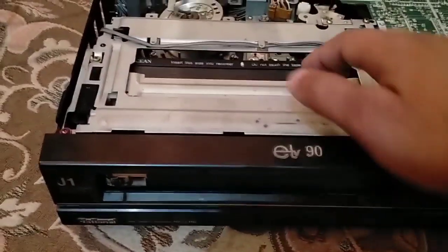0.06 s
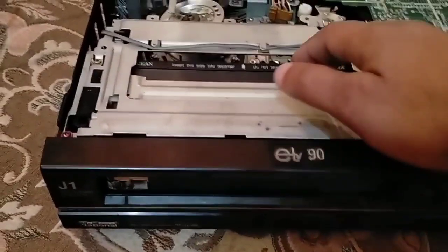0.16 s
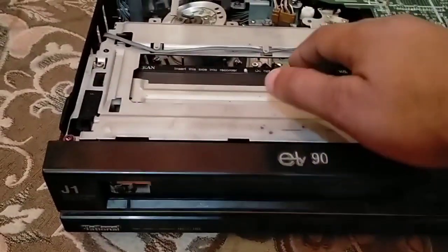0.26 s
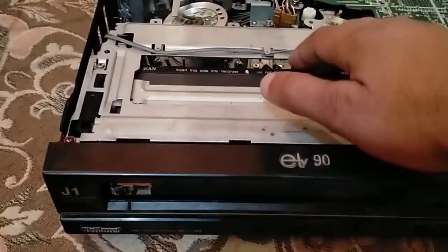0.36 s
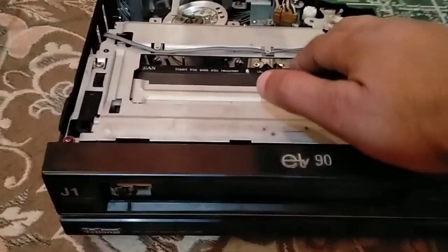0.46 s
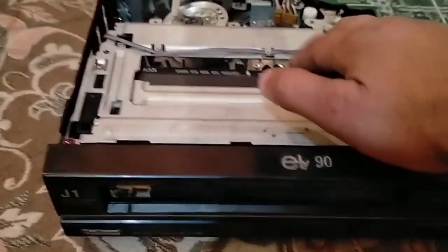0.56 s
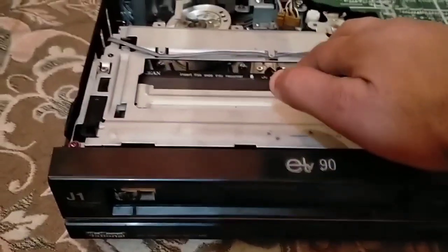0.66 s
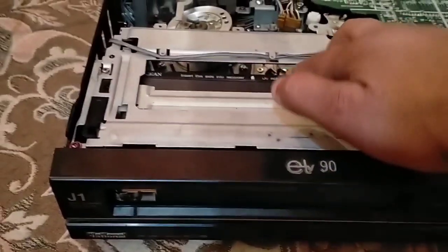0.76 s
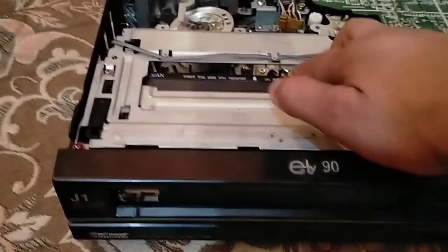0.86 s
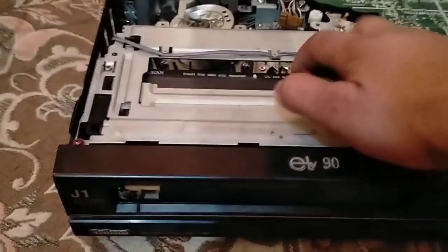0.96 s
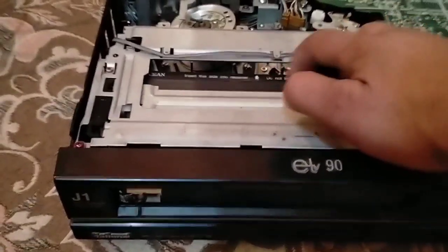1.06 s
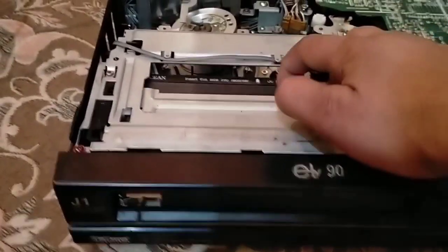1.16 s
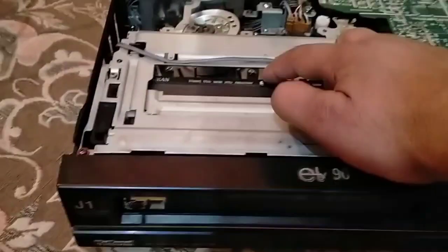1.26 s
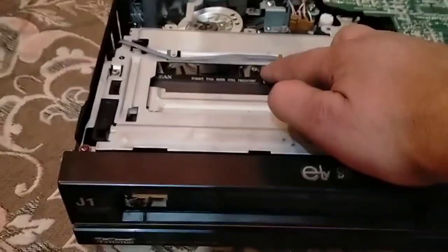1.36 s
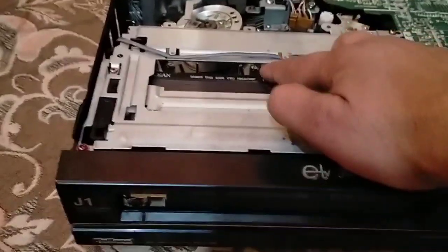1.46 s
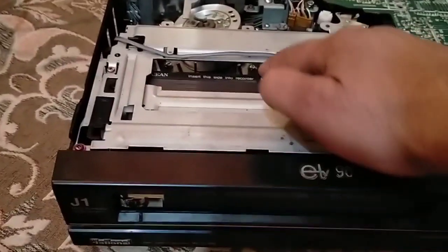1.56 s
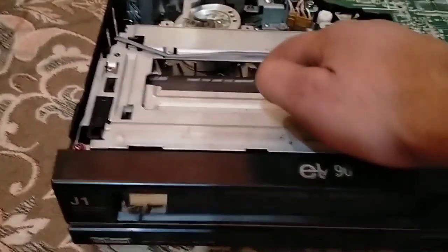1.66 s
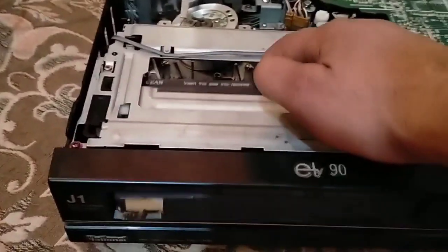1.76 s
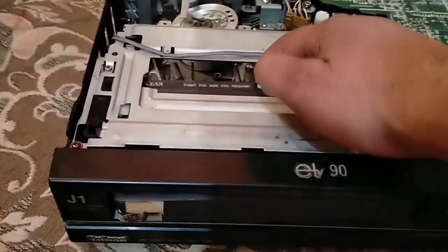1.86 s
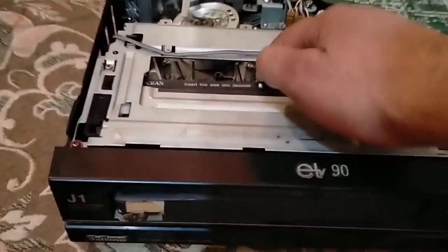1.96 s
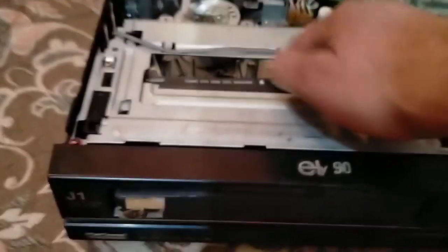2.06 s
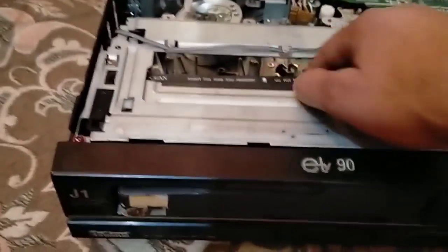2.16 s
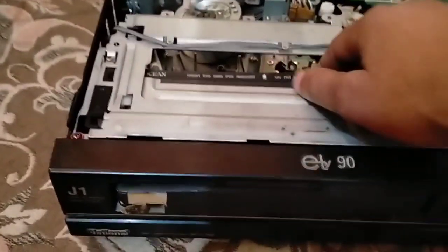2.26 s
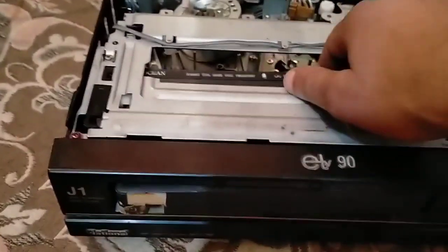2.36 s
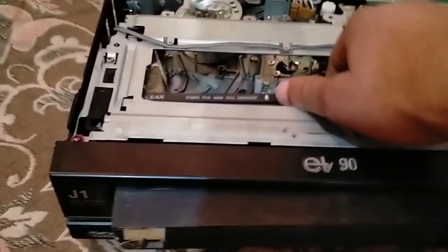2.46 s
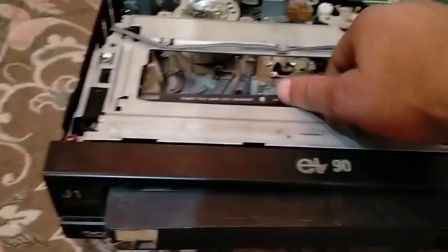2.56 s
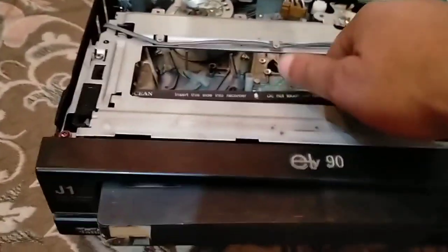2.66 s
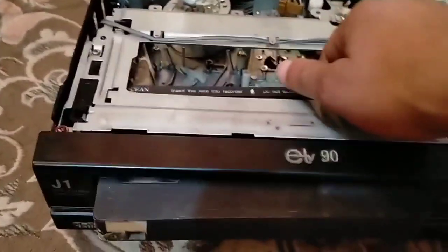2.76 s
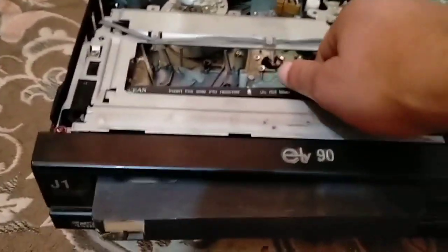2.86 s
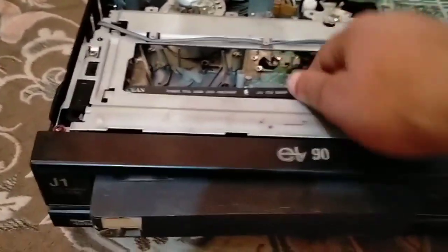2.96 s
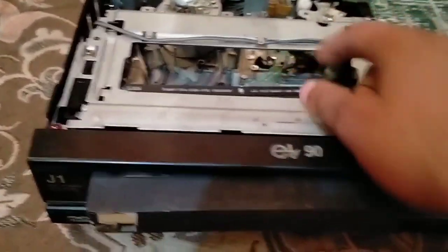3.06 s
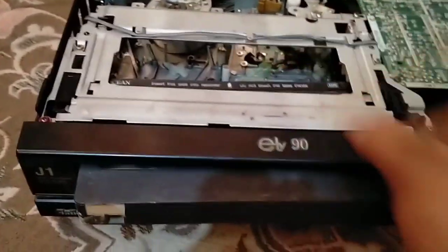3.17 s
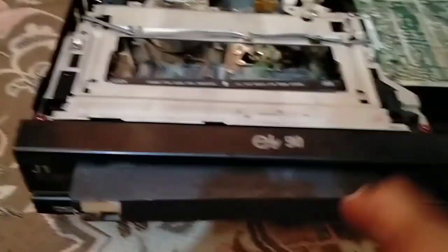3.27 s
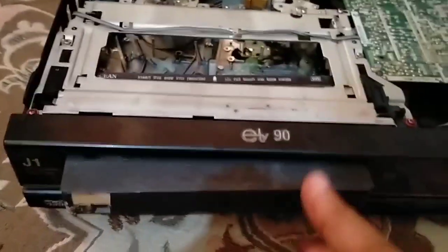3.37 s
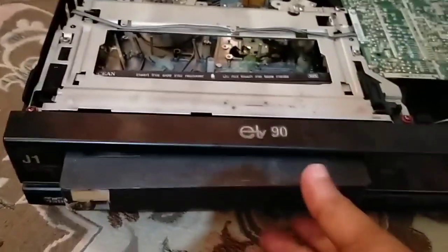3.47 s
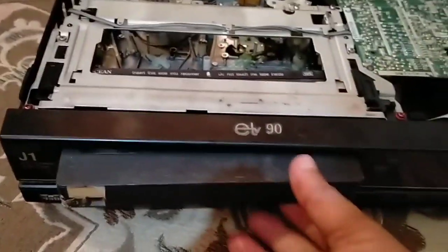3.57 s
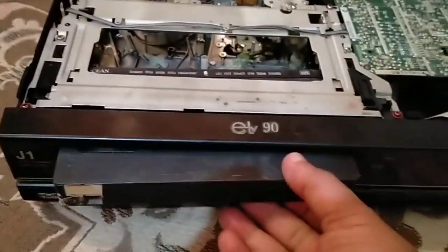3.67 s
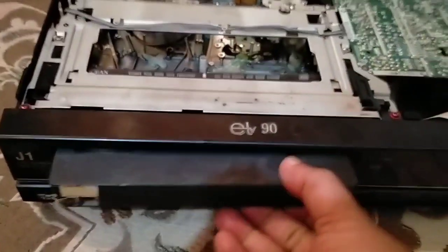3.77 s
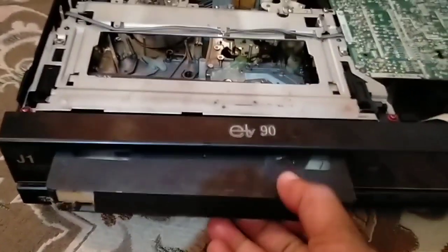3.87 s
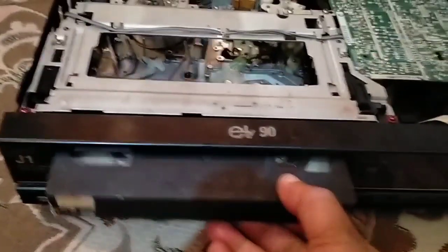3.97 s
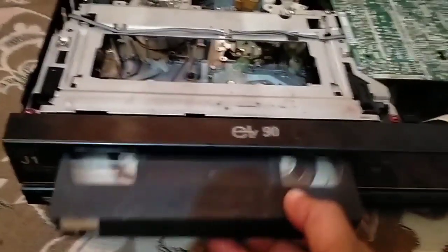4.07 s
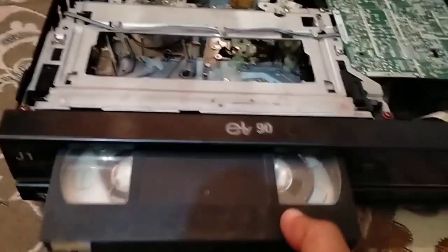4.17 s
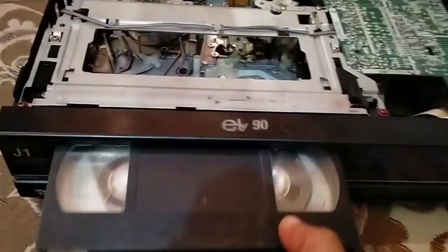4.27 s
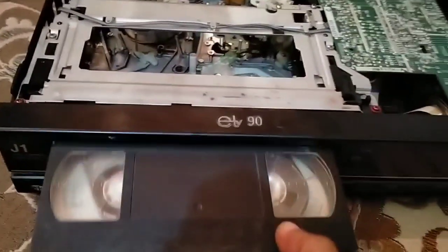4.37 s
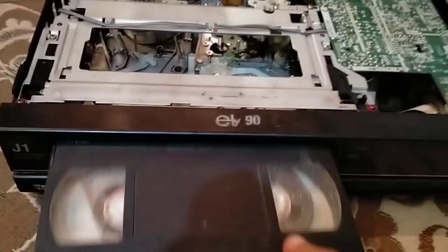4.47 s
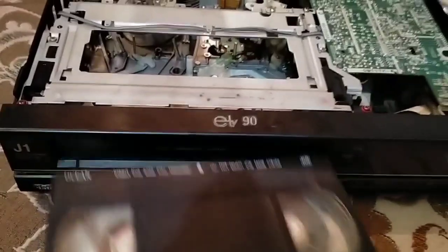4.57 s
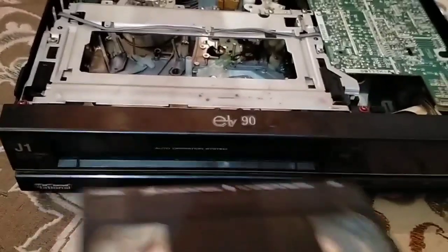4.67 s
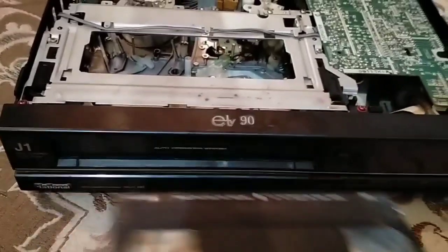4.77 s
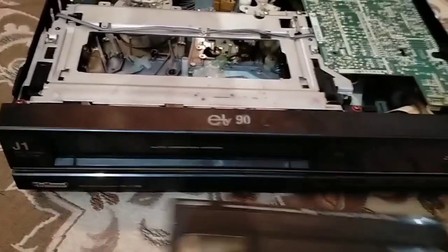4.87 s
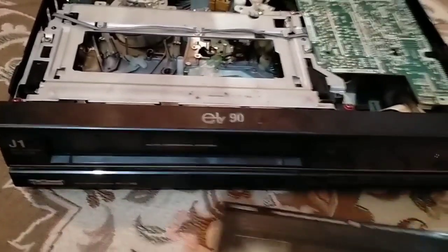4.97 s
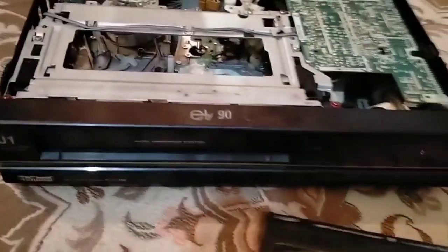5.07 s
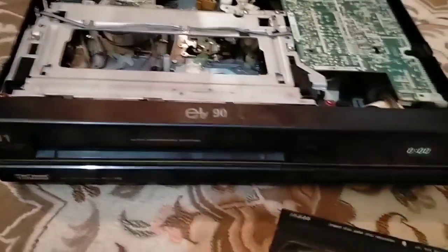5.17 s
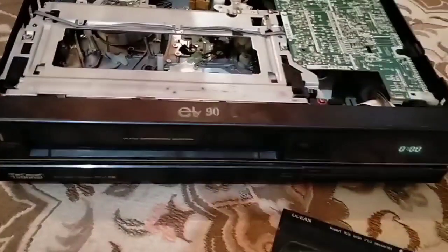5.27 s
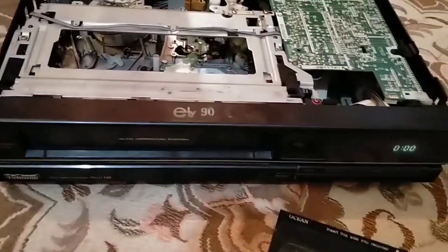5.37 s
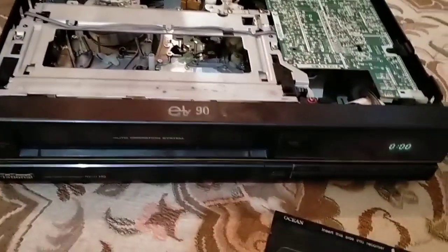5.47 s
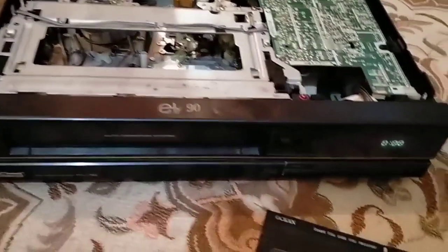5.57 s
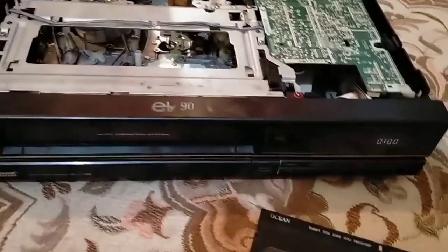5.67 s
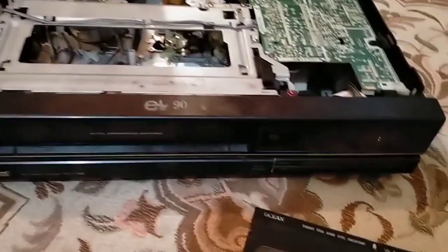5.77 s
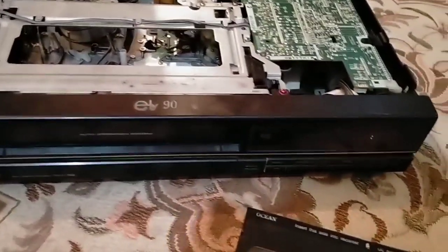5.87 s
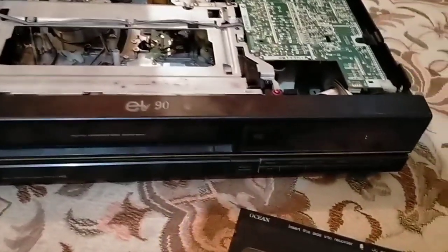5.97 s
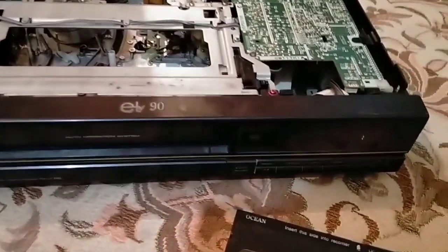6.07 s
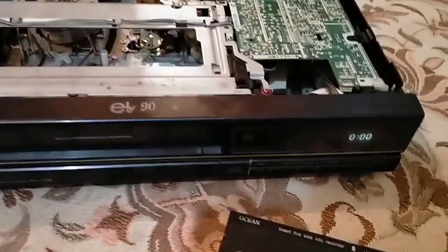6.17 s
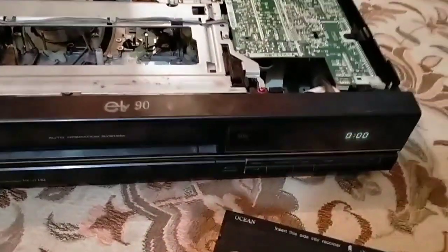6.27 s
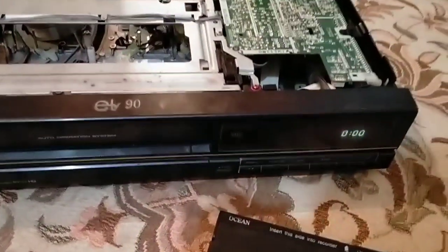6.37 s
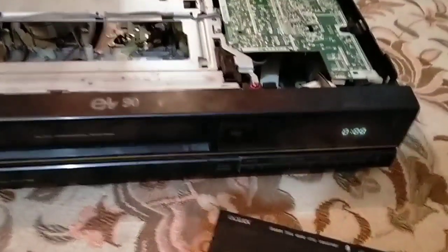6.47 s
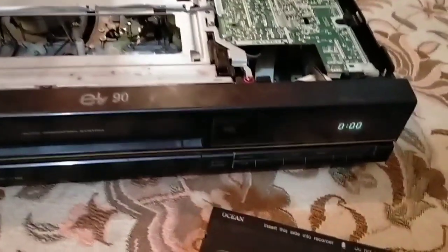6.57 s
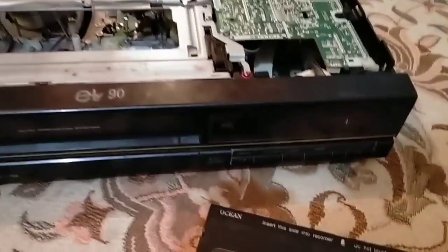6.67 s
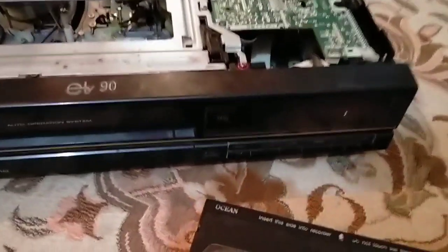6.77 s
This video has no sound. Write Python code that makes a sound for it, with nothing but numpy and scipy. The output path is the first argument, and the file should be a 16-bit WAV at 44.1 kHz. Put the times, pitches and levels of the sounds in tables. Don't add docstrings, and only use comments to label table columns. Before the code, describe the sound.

Hollow plastic and thin metal click and knock as a cassette is worked loose, crunches upward, snaps, then scrapes out over faint hum.

```python
import sys
import numpy as np
from scipy import signal
from scipy.fft import rfft, irfft
from scipy.io import wavfile
from scipy.ndimage import uniform_filter1d

SR = 44100
rng = np.random.default_rng(int(sys.argv[2]) if len(sys.argv) > 2 else 0)


def invert_db(level):
    return 10 ** (np.asarray(level, dtype=float) / 20)


def inscribe(sig):
    pcm = np.round(np.clip(np.atleast_2d(sig).T, -1, 1) * 32767)
    wavfile.write(sys.argv[1], SR, pcm.astype(np.int16))


N = 301203

# (time [s], shell peak level [dB], shell spot [Hz], tray level re shell [dB], tray spot [Hz])
SHELL_TRAY_CONTACTS = [(0.73, -48.5, 630, 0, 1590), (0.736, -45.5, 650, -1.5, 1890), (0.85, -61, 382, -2, 1340),
                       (1.095, -33, 643, -9, 1650), (1.246, -35.5, 294, 4.5, 1680), (1.252, -32, 720, -23, 1700),
                       (1.265, -46.5, 402, 15, 1720), (1.271, -26.5, 694, -18, 1660),
                       (1.304, -45.5, 746, 2.5, 1110), (1.392, -38.5, 660, -5, 1670),
                       (1.588, -40, 380, -6, 1610), (1.593, -29.5, 670, 2.5, 1650),
                       (1.598, -26.5, 700, -9, 1670), (1.709, -33.5, 660, 1, 1600), (1.737, -44, 684, 5.5, 1780),
                       (2.201, -42.5, 606, -8, 1480), (2.21, -41, 636, -12, 1230), (2.311, -51, 385, -11, 1210),
                 (2.388, -28, 625, 3.5, 1490), (2.555, -30.5, 610, -3, 1760), (2.738, -32, 790, -10, 1960),
                 (2.942, -39, 675, 2.5, 1520), (2.974, -41.5, 611, 8, 1720), (2.98, -35, 700, -3, 1680),
                 (3.0685, -22, 450, 0.5, 1740), (3.4892, -31, 900, 13, 1900), (3.517, -28, 700, -11, 1730),
                       (4.298, -38, 630, -5.5, 2610), (4.355, -53, 650, -2.5, 1890), (4.478, -48, 630, 0.5, 1600),
                 (4.517, -44, 630, -1, 2260), (4.553, -39.5, 630, -8, 1630), (4.577, -44, 630, -2, 1140),
                 (4.607, -45, 740, 3, 1260), (4.632, -38, 644, -2, 1410), (4.79, -48, 447, -6, 1390),
                 (4.9, -51, 516, -12, 1330), (4.964, -42, 571, -16, 2190), (4.981, -34, 575, -7, 1650),
                 (5.051, -35.5, 654, -12, 1140), (5.0766, -37.5, 297, 9, 1220),
                 (5.083, -30.5, 845, 4, 2420), (5.097, -43.5, 689, 3, 2020), (5.645, -49, 450, -0.5, 1700),
                 (5.806, -51, 600, -9, 1510), (5.828, -53, 770, 5.5, 1650), (6.063, -42.5, 316, -2, 1510),
                 (6.071, -42, 664, -9, 1470), (6.086, -55, 624, -10, 1490), (6.097, -60, 640, 1, 2400)]
# (time [s], peak level [dB], shell spot [Hz])
SECOND_SPOTS = [(1.245, -35.5, 620), (1.594, -40, 388), (2.389, -26, 547), (2.389, -28.5, 306),
                (2.554, -37, 393), (2.739, -33.5, 437), (3.069, -26, 670), (3.489, -37, 545),
                (4.299, -49, 428), (5.077, -42, 700), (5.652, -50, 499), (5.834, -54, 576)]
SECOND_TRAY_DB, SECOND_TRAY_HZ = -8.5, 2258

# (time [s], peak level [dB], brightness
# [dB])
CONTACT_CLICKS = [(0.7292, -50, -20), (0.736, -46, -22), (0.849, -55.5, -10), (1.0937, -35, 0),
                  (1.2447, -29, 4.5), (1.266, -37.5, 12.5), (1.271, -29, -4), (1.3917, -46, -9),
                  (1.507, -56.5, -13), (1.5926, -36.5, -1.5), (1.6007, -31.5, -17), (1.711, -25.5, -2.5),
                  (1.7384, -50, 8), (2.176, -58, -4), (2.2005, -37, -11), (2.311, -59, -14),
                  (2.3884, -29.5, -6.5), (2.5537, -26.5, -2.5), (2.737, -40.5, -13), (2.9423, -30, -4),
                  (2.972, -28, -4), (2.9792, -37.5, 7.5), (3.008, -42, -6), (3.0689, -27.5, -8),
                  (3.2605, -59, -15), (3.4895, -21, 10), (3.5176, -27, -1),
                  (4.2986, -40, -4), (4.354, -47.5, -14), (4.4772, -53, -15), (4.5151, -50, -7),
               (4.553, -46, -15), (4.6042, -43.5, -23), (4.6304, -50, -16), (4.791, -57, -12),
               (4.9819, -38.5, -7), (5.076, -25, 2.5), (5.085, -44, 6), (5.0977, -37, -6),
               (5.6446, -57, -5), (5.6574, -65, 11.5), (5.8287, -55, -16), (5.8354, -61, -12),
               (6.0633, -46, -24), (6.071, -39.5, -12), (6.0956, -57, -20)]

# (time of firmest grip [s], rise [s], fall [s], shell level [dB], hiss re shell [dB])
SHORT_DRAGS = [(0.574, 0.027, 0.037, -67.5, -1), (0.856, 0.037, 0.046, -65, -21),
               (1.035, .02, 0.035, -70, -6), (1.094, .025, 0.0055, -52, -3), (2.284, 0.014, 0.086, -56, -9),
               (4.316, .005, 0.087, -58.5, 1.5), (4.359, 0.013, 0.048, -58, -9),
               (5.061, 0.086, 0.0083, -47.5, -13), (5.683, 0.018, 0.16, -68, 0.5),
               (5.8, .04, .004, -67.5, -0.5), (5.859, .004, 0.01, -66, -11), (5.96, 0.06, .2, -63.5, -28)]
# (time [s], grip level [dB], hiss re grip [dB])
TRAY_RISE = [
    (2.15, -74, 3),
    (2.17, -58, 2.5),
    (2.196, -61, 5.5),
    (2.232, -57, -9),
    (2.268, -78, 0),
]
# (time [s], grip level [dB], hiss re grip [dB])
TRAY_CRUNCH = [
    (2.9, -70, -11),
    (2.932, -53, -7.5),
    (2.943, -46, 1.5),
    (2.99, -41, -7),
    (3.04, -58.5, -12),
    (3.055, -78, -6),
]
# (time [s], grip level [dB], hiss re grip [dB])
FLAP_DRAG = [
    (3.27, -70, -1.5),
    (3.34, -63.5, -11.5),
    (3.408, -59.5, -10),
    (3.47, -80.5, -15),
]
# (time [s], grip level [dB], hiss re grip [dB])
CASSETTE_DRAW = [
    (4.49, -64.5, -0.5),
    (4.556, -47, -8),
    (4.616, -53.5, -12.5),
    (4.778, -65, -10.5),
    (4.8, -65.5, -12),
    (4.9, -61.5, -12),
    (4.975, -44, -23),
    (5.02, -66, -16),
]

# (time [s], peak level [dB], pitch [Hz])
BOX_THUDS = [
    (1.269, -44.5, 235),
    (1.594, -41, 220),
    (1.711, -54, 110),
    (2.387, -44, 213),
    (2.972, -41, 210),
    (2.96, -51, 40),
    (3.069, -61, 201),
    (3.487, -44.5, 208.6),
    (5.072, -46, 131),
    (6.061, -43, 142),
]

# (frequency [Hz], level [dB], t60 [s])
SHELL_MODES = [(301, 1, 0.043), (393.2, 8, 0.029), (450, -0.5, 0.032), (580, -12, 0.015), (640, 4.5, 0.047),
               (735, 2, 0.031), (785, 1.5, 0.029), (978, 0.5, 0.032)]
# (frequency [Hz], level [dB], t60 [s])
TRAY_MODES = [(1113, 0.5, 0.034), (1260, -1.5, 0.022), (1545, -1.3, 0.018), (1650, 2.4, 0.019),
              (1813, -7, 0.05), (1994, -3, 0.019), (2276, -0.6, 0.016), (2490, -0.5, 0.019)]
# (frequency [Hz], level [dB], t60 [s])
LATCH_MODES = [(2780, -3, .015), (3090, 0, .02), (3600, -2, .015), (4100, -4, .012), (4600, -3, .012)]

# (frequency [Hz], level [dB])
MIC_COLOUR = [(2000, 9.5), (3500, -1.5), (5200, -4.5), (6300, 1.5), (7600, 2.5), (9500, -9), (11500, -4),
              (13500, 4.5), (15450, 1), (15650, -22), (16500, -39.5)]
# (frequency [Hz], t60 [s], level [dB])
ROOM_TAIL = [(287, 0.4, -26), (700, 0.38, -24), (1600, 0.28, -20), (3360, 0.26, -22), (6700, 0.3, -23.5),
             (13000, 0.26, -21.5)]
# (frequency [Hz], level per Hz [dB])
AIR_SPECTRUM = [(15, -8), (40, -11.5), (90, -11.5), (160, -15.5), (250, -16.5), (400, -27.5), (950, -23),
                (1600, -22), (2800, -30), (4900, -35.5), (10500, -36.5), (13500, -24.5), (15450, -21.5),
                (15650, -45.5)]
# (frequency [Hz], width [Hz], level [dB])
FAN_HUM = [(68, 23, -80.5), (109.6, 13.2, -69), (234, 130, -80.5), (1285, 90, -75.5), (1390, 71, -75),
           (2790, 270, -84), (7440, 820, -85)]
# (time [s], level [dB])
SUPPRESSOR_SWELL = [(0.0, -75.5), (0.55, -77), (1.27, -71), (2.17, -72.5), (2.36, -70.5), (3.48, -70),
                    (4.011, -77.5), (4.26, -76.5), (5.06, -69.5), (5.48, -76), (5.67, -77.5), (6.03, -74),
                    (6.83, -77.5)]

AIR_DB, QUIET_DB = -70, -77
SCATTER_DB, DETUNE, LONGEST_S = 2.0, 0.016, 0.046
FOCUS_DB, RUB_FOCUS_DB = 20, 36
CRUNCH_FOCUS_DB = 6
CONTACT_MS, SOFTER_MS_PER_DB, FIRM_DB = 1.5, 0.13, -33
CLICK_MS, CLICK_SOFTER_MS_PER_DB = 2.19, 0.03
LOOSE_DB, RUB_LOOSE_DB = -7, -12
EDGE_DB, EDGE_SHARE = -3, 0.33
RUB_HZ, FLAP_HZ = (630, 2010), (845, 2454)
GRIP_RANGE_DB = 30
RUB_TRAY_DB, FLAP_TRAY_DB, CRUNCH_TRAY_DB = -3.5, 0.5, 2.5
RUB_TRAY_SHARE = 0.33
PLACE_S, PLACES = 0.16, 5
EARLY_DB, EARLY_S = -2.5, 0.028


def knocks():
    out = np.zeros(N)
    second = [row + (SECOND_TRAY_DB, SECOND_TRAY_HZ) for row in SECOND_SPOTS]
    for s, db, shell_hz, tray_db, tray_hz in SHELL_TRAY_CONTACTS + second:
        chance = rng.standard_normal((2, 3, 9))
        ms = CONTACT_MS + SOFTER_MS_PER_DB * (FIRM_DB - db)
        start = s - 0.001
        add(out, start, ring(SHELL_MODES, chance[0], shell_hz, ms), db)
        add(out, start, ring(TRAY_MODES, chance[1], tray_hz, 0.89 * ms), db + tray_db)
        add(out, start, band(rattle(ms), 300, 1000), db + LOOSE_DB)
        add(out, start, band(rattle(ms), 1000, 2600), db + tray_db + LOOSE_DB / 2)
    return band(out, 190, 6200)


def clicks():
    out = np.zeros(N)
    for s, db, bright_db in CONTACT_CLICKS:
        ms = CLICK_MS + CLICK_SOFTER_MS_PER_DB * (FIRM_DB - db)
        start = s - 0.001
        push = rattle(ms)
        latch = signal.fftconvolve(push, ring(LATCH_MODES, rng.standard_normal((3, 9))))
        edge = colour(band(rattle(ms), 4700, 9000), MIC_COLOUR)
        crack = colour(band(push, 9000, 16500), MIC_COLOUR)
        add(out, start, band(latch, 2300, 5200), db + LOOSE_DB)
        add(out, start, band(push, 2400, 5000), db - 2)
        add(out, start, edge, db + EDGE_DB + EDGE_SHARE * bright_db)
        add(out, start, crack, db + bright_db)
    return out


def drags():
    grit = rng.standard_normal(N) * invert_db(2.4 * walk(50) + 2.5 * walk(400))
    hiss = level(colour(band(grit, 3100, 16500), MIC_COLOUR), 0)
    rough = level(band(grit, 800, 3800), -4)
    loose = level(band(grit, 300, 1000), RUB_LOOSE_DB)
    t, no_chance = np.arange(N) / SR, np.zeros((3, 9))
    short = [[(s - rise, db - GRIP_RANGE_DB, hiss_db),
              (s, db, hiss_db),
              (s + fall, db - GRIP_RANGE_DB, hiss_db)]
             for s, rise, fall, db, hiss_db in SHORT_DRAGS]
    groups = [(short + [TRAY_RISE, CASSETTE_DRAW], RUB_HZ, RUB_TRAY_DB, RUB_FOCUS_DB),
              ([FLAP_DRAG], FLAP_HZ, FLAP_TRAY_DB, RUB_FOCUS_DB),
              ([TRAY_CRUNCH], RUB_HZ, CRUNCH_TRAY_DB, CRUNCH_FOCUS_DB)]
    out = np.zeros(N)
    for group, (shell_hz, tray_hz), tray_db, focus_db in groups:
        shell_ring = ring(SHELL_MODES, no_chance, shell_hz, focus_db=focus_db)
        tray_ring = ring(TRAY_MODES, no_chance, tray_hz, focus_db=focus_db)
        shell = level(signal.fftconvolve(grit, shell_ring)[:N], 0) + loose
        tray = invert_db(tray_db) * (level(signal.fftconvolve(grit, tray_ring)[:N], 0) + rough)
        for drag in group:
            s, db, hiss_db = np.transpose(drag)
            span = slice(int(s[0] * SR), int(s[-1] * SR))
            u = t[span]
            grip = invert_db(np.interp(u, s, db))
            bright = invert_db(np.interp(u, s, hiss_db))
            touch = np.clip(np.minimum(u - s[0], s[-1] - u) / 0.0019, 0, 1)
            rub = shell[span] + bright ** RUB_TRAY_SHARE * tray[span] + bright * hiss[span]
            out[span] += touch * grip * rub
    return band(out, 190, 21000)


def thuds():
    out, t = np.zeros(N), np.arange(6000) / SR
    for s, db, hz in BOX_THUDS:
        bounce = np.sin(2 * np.pi * hz * t) * np.exp(-t * hz / 1.1)
        add(out, s, bounce * (1 - np.exp(-t / 0.0011)), db)
    return out


def room(x):
    t = np.arange(SR // 2) / SR
    hz = np.array(ROOM_TAIL)[:, 0]
    edges = np.r_[200, np.sqrt(hz[1:] * hz[:-1]), 16000]
    build_up = np.clip((t - 0.002) / 0.0019, 0, 1)
    early = 1 + invert_db(EARLY_DB) * np.exp(-t / EARLY_S)
    place, out = np.arange(N) / SR / PLACE_S % PLACES, np.zeros(N)
    for k in range(PLACES):
        away = np.abs(place - k)
        away = np.minimum(away, PLACES - away)
        share = np.cos(np.pi / 2 * np.clip(away, 0, 1))
        tail = np.zeros(len(t))
        for (_, t60, db), lo, hi in zip(ROOM_TAIL, edges, edges[1:]):
            noise = level(band(rng.standard_normal(len(t)), lo, hi), db - 25.5)
            tail += noise * np.sqrt((hi - lo) / 3000) * invert_db(-60 * t / t60)
        out += signal.fftconvolve(x * share, tail * build_up * early)[:N]
    return out


def background():
    s, db = np.transpose(SUPPRESSOR_SWELL)
    open_db = np.interp(np.arange(N) / SR, s, db) - QUIET_DB
    air = level(colour(rng.standard_normal(N), AIR_SPECTRUM), AIR_DB)
    bass = colour(air, [(150, -16.5), (600, -51.5)])
    out = bass * invert_db(0.4 * open_db) + (air - bass) * invert_db(open_db)
    for hz, width, db in FAN_HUM:
        tone = signal.lfilter(*signal.iirpeak(hz, hz / width, fs=SR), rng.standard_normal(N))
        tone = signal.lfilter(*signal.iirpeak(hz, hz / width / 2, fs=SR), tone)
        opening = min(0.61 + hz / 3000, 0.9) * open_db
        out += level(tone, db) * invert_db(opening + 2.4 * walk(5.4))
    return out


def ring(modes, chance, centre_hz=None, ms=0.13, focus_db=FOCUS_DB, size=4000):
    hz, db, t60 = np.transpose(modes)[:, :, None]
    t = np.arange(size) / SR
    scatter, detune, phase = chance[:, :len(modes), None]
    if centre_hz:
        db = db - focus_db * np.abs(np.log2(hz / centre_hz))
    fade_db = 60 * t / np.minimum(t60, LONGEST_S)
    wave = np.sin(2 * np.pi * (hz * (1 + DETUNE * detune) * t + phase))
    partials = invert_db(db + SCATTER_DB * scatter - fade_db) * wave
    onset = 1 - np.exp(-(t * 1000 / np.clip(ms, 0.1, 8)) ** 2)
    return np.sum(partials, axis=0) * onset


def rattle(ms):
    u = np.arange(2048) / SR * 1000 / np.clip(ms, 0.2, 6)
    shape = u * np.exp(1 - u)
    grit = rng.standard_normal(len(u)) * shape
    for _ in range(3):
        spectrum = rfft(grit)
        grit = irfft(spectrum / np.abs(spectrum)) * np.sqrt(shape)
    return grit


def walk(rate):
    k = int(SR / rate)
    held = np.repeat(rng.standard_normal(N // k + 1), k)
    return 1.3 * uniform_filter1d(uniform_filter1d(held, k), k)[:N]


def level(x, db):
    return x * invert_db(db) / np.sqrt(np.mean(x ** 2))


def colour(x, points):
    hz, db = np.transpose(points)
    f = np.fft.rfftfreq(len(x), 1 / SR) + 1
    return irfft(rfft(x) * invert_db(np.interp(np.log(f), np.log(hz), db)), len(x))


def band(x, lo_hz, hi_hz):
    return signal.sosfilt(signal.butter(3, [lo_hz, hi_hz], "band", fs=SR, output="sos"), x)


def add(out, s, sound, db):
    i = int(s * SR)
    out[i:i + len(sound)] += (sound * invert_db(db) / np.max(np.abs(sound)))[:N - i]


def scene():
    handled = knocks() + clicks() + drags()
    return (handled + room(handled) + thuds() + background())[None]


def low_pass(x):
    return signal.sosfilt(signal.butter(12, 16650, fs=SR, output="sos"), x)


def record(dry):
    top = signal.ellip(8, 0.3, 35, 15600, fs=SR, output="sos")
    return low_pass(signal.sosfilt(top, dry))


dry = scene()
out = record(dry)
inscribe(out)
```